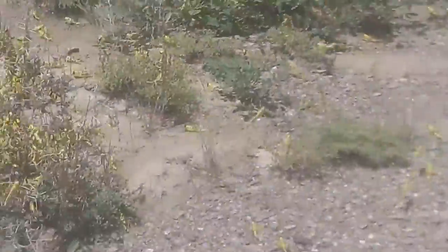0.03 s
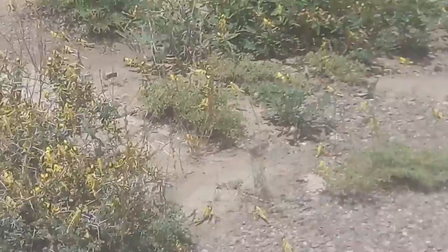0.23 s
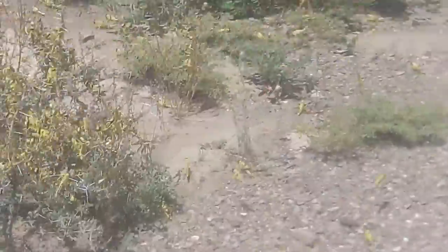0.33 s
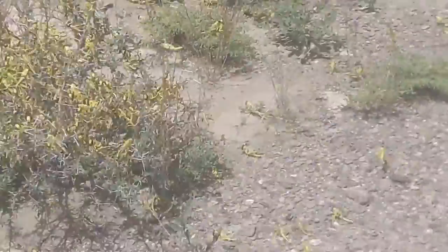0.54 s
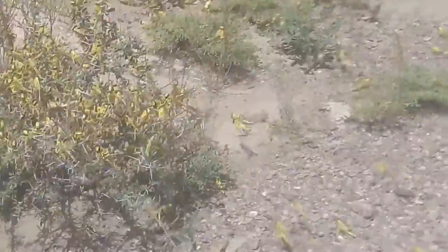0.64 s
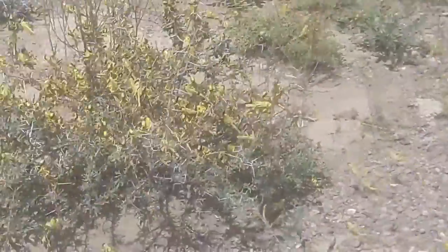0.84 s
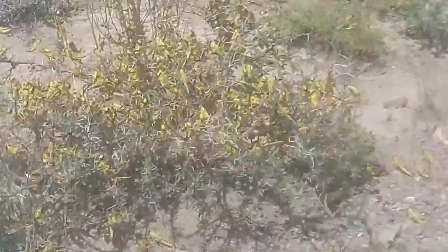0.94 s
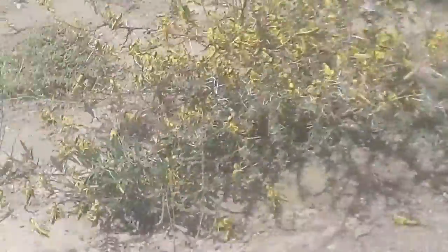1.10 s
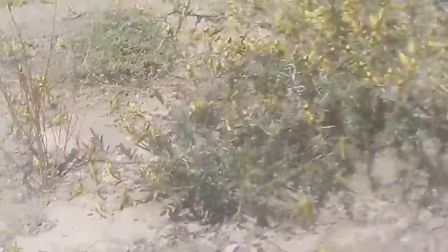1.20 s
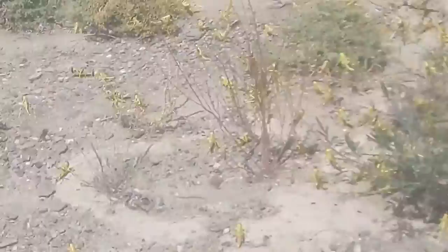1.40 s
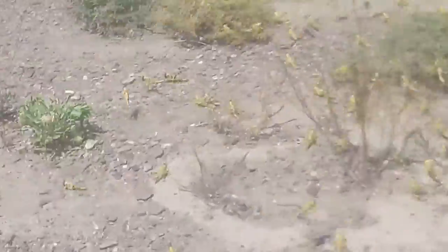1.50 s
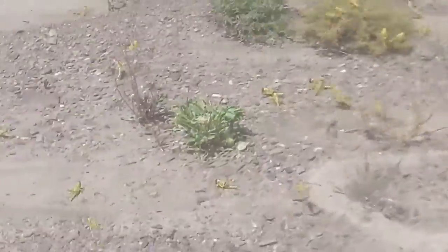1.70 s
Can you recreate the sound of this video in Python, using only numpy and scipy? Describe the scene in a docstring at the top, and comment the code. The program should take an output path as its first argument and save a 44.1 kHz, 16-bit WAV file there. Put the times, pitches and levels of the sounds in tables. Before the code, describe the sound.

Wind buffets the microphone with low thumps and pops, strongest from about 0.4 to 0.8 seconds and again near 1.1, then dropping to a soft rumble after 1.5. Throughout, a locust swarm makes quieter ticks, papery wing flutters and small dry snaps on twigs and stones. Grit crunches lightly around 0.3 and 0.5 seconds. A distant bird gives two faint short whistles at about 1.2 and 1.3 seconds.

```python
"""Gusts thump on a hand-held microphone over the ticking and rustling of a locust swarm in dry scrub.
Wind eddies give low buffeting and single pops. The insects make countless tiny leg ticks, papery
wing strokes and a few near snaps as they land on twigs and stones. Something scuffs and crunches
the grit, and a distant bird whistles two short notes over a steady low rumble of air."""
import sys
import numpy as np
from scipy import signal
from scipy.fft import rfft, irfft, next_fast_len
from scipy.io import wavfile
from scipy.ndimage import uniform_filter1d, map_coordinates

SR = 44100
rng = np.random.default_rng(int(sys.argv[2]) if len(sys.argv) > 2 else 0)


def store_pcm(level_fs):
    """Save levels as 16-bit WAV."""
    pcm = np.round(np.clip(level_fs, -1, 1) * 32767).astype(np.int16)
    wavfile.write(sys.argv[1], SR, np.atleast_2d(pcm).T)


N = 77175

# Spectrum of a struck dry twig. Each row: frequency in Hz, gain in dB.
TWIG_SPECTRUM = [(300, -5), (1500, -6.5), (3500, -6.5), (5200, -10), (6300, -0.5), (7200, 8), (8150, -11),
                 (9000, -1), (11500, -6.5), (13500, -9), (15600, -27)]


def amp(db):
    return 10 ** (np.asarray(db) / 20)


def unit_rms(x):
    return x / np.sqrt(np.mean(x ** 2) + 1e-20)


def time_s():
    return np.arange(N) / SR


def wobble(knots_per_s):
    """Smooth random curve."""
    return map_coordinates(rng.standard_normal(2000), [time_s() * knots_per_s + 2], mode="wrap")


def colour(x, spectrum):
    """Minimum-phase filter shaped by (Hz, dB) rows, scaled to unit power gain."""
    size = 2 * next_fast_len(N)
    hz, db = np.transpose(spectrum)
    gain = amp(np.interp(np.log(np.fft.rfftfreq(size, 1 / SR) + 1), np.log(hz), db))
    cepstrum = irfft(np.log(unit_rms(gain)))
    cepstrum[1:size // 2] *= 2
    cepstrum[size // 2 + 1:] = 0
    return irfft(rfft(x, size) * np.exp(rfft(cepstrum)), size)[:N]


def noise(spectrum):
    return unit_rms(colour(rng.standard_normal(N), spectrum))


def turbulence(spectrum, evenness):
    """Coloured noise, rms 1; evenness from 0 to 1 flattens its chance swells."""
    x = noise(spectrum)
    power = uniform_filter1d(np.abs(signal.hilbert(x)) ** 2, size=800)
    return unit_rms(x / (np.abs(power) + 1e-6) ** (evenness / 2))


def ticks(per_s, spread_db):
    """Random tiny impacts of uneven size, rms 1."""
    size = amp(spread_db * np.clip(rng.standard_normal(N), -2, 2))
    return unit_rms((rng.random(N) < per_s / SR) * size * rng.choice([-1, 1], N))


def swells(rows):
    """Bell-shaped envelopes, summed in power."""
    return np.sqrt(sum(amp(2 * db) * np.exp(-(2 * (time_s() - centre_s) / length_s) ** 2)
                       for centre_s, length_s, db in rows))


def wind(strong_db=-20):
    """Large eddies buffet in step with the wind; smaller ones grow faster, the smallest flare in gusts."""
    # Each row: time in seconds, wind level in dB.
    wind_levels = [(0, -31.5), (0.064, -39.5), (.11, -52.5), (.16, -47), (0.188, -32.5), (.24, -33.5),
                   (0.255, -26), (0.286, -34.5), (0.382, -36), (0.424, -21.5), (0.477, -28.5), (0.498, -21),
                   (0.568, -18.5), (0.603, -26), (0.617, -18.5), (.65, -33), (0.705, -33.5), (0.714, -21),
                   (0.773, -18.5), (.783, -20.5), (0.793, -35.5), (0.858, -29.5), (.9, -41), (.985, -37),
                   (1.051, -47), (1.059, -28), (1.075, -33), (1.091, -20.5), (1.118, -29.5), (1.151, -22),
                   (1.19, -28), (1.233, -23), (1.245, -35.5), (1.352, -33.5), (1.382, -28), (1.425, -38),
                   (1.433, -27.5), (1.452, -27), (1.487, -30), (1.502, -54), (1.6, -46), (1.705, -68),
                   (1.75, -66)]
    # Each row: centre in seconds, length in seconds, relative level in dB.
    gusts = [(.275, 0.085, -52), (.424, 0.028, -31.5), (.5, 0.021, -43), (.552, 0.0048, -30),
             (.58, 0.028, -37.5), (.618, 0.006, -31), (.725, 0.038, -40), (.758, 0.035, -30.5),
             (1.063, 0.016, -42), (1.16, 0.072, -47), (1.3, 0.063, -53)]
    # Large, middle and small eddies. Each row: frequency in Hz, gain in dB.
    buffet_spectrum = [(20, -33.5), (45, -14), (75, -2.5), (125, 4), (190, -7.5), (280, -18.5), (400, -36),
                       (600, -60.5), (1200, -66)]
    flutter_spectrum = [(60, -27), (130, -1), (180, 0.5), (290, -2.5), (390, -15), (600, -30), (1200, -59)]
    eddy_spectrum = [(100, -31.5), (250, 4), (480, -1), (700, -13.5), (1000, -25), (1500, -32.5),
                     (3000, -62)]
    over_db = np.interp(time_s(), *np.transpose(wind_levels)) - strong_db
    buffet = amp(strong_db - 2 + over_db) * turbulence(buffet_spectrum, evenness=0.52)
    flutter = amp(strong_db - 4.5 + 1.48 * over_db) * turbulence(flutter_spectrum, evenness=0.69)
    eddy_level = np.hypot(amp(strong_db - 25 + 2.5 * over_db), amp(2) * swells(gusts))
    return buffet + flutter + eddy_level * turbulence(eddy_spectrum, evenness=0.83)


def eddy_pops():
    """Each eddy passing the microphone gives one pull and push of pressure, sharper if smaller."""
    # Each row: centre in seconds, half-width in ms, peak before filtering in dB.
    eddies = [(0.22, 1, -28.5), (0.2578, 2.8, -18.5), (0.324, 1.9, -23.5), (0.4248, 0.92, -13.5),
              (0.45, 1, -21), (0.524, 0.89, -19.5), (.554, 0.9, -11), (.617, 0.97, -13), (0.712, 1.4, -18),
              (.763, 1.02, -10.5), (0.854, 1.55, -23.5), (0.991, 1.36, -31.5), (1.062, 1.4, -24),
              (1.094, 1.22, -18), (1.161, 0.8, -20.5), (1.431, 2, -20), (1.543, 2.9, -37),
              (1.598, 1.3, -40.5), (1.68, 4.3, -37), (1.731, 4.3, -31.5)]
    # Each row: frequency in Hz, gain in dB.
    pop_spectrum = [(20, -54), (50, -8), (100, -3), (200, 3), (300, -2.5), (400, -11.5), (700, -5),
                    (2000, -6.5)]
    pressure = np.zeros(N)
    for centre_s, half_width_ms, db in eddies:
        offset = (time_s() - centre_s) * 1000 / half_width_ms
        pulse = offset / (1 + offset ** 2) ** 2
        pressure += amp(db) * pulse / np.abs(pulse).max()
    return unit_rms(colour(pressure, pop_spectrum)) * pressure.std()


def swarm():
    """Locusts on dry ground: a far hiss, clumped leg ticks and near bursts of rustling."""
    # Each row: frequency in Hz, gain in dB.
    far_spectrum = [(100, -4), (500, -0.5), (1000, 0), (2000, -6), (3300, 0), (5000, -5), (6200, 0.5),
                    (7250, 3), (8150, -9.5), (9000, -3), (11500, -1.5), (13500, -11), (15600, -22)]
    near_spectrum = [(300, -24), (1500, -2), (3500, -5.5), (5200, -5.5), (6300, 0), (7250, 7), (8150, -14),
                     (9000, -1.5), (11500, -7.5), (13500, -17), (15600, -11)]
    # Each row: centre in seconds, length in seconds, relative level in dB.
    rustles = [(.06, 0.064, -52.5), (.155, 0.014, -51.5), (.32, 0.07, -48.5), (.675, 0.048, -50),
               (.807, 0.011, -47), (.837, 0.021, -49), (.885, 0.065, -50.5), (1.0, 0.041, -54),
               (1.07, 0.035, -52), (1.196, 0.032, -47), (1.29, 0.054, -51.5), (1.34, 0.05, -53.5),
               (1.7, 0.013, -48)]
    hiss = amp(-57 + 0.067 * wobble(17)) * noise(far_spectrum)
    legs = unit_rms(ticks(per_s=1500, spread_db=6.5) * amp(2 * np.tanh(wobble(69.44))))
    bursts = swells(rustles) * unit_rms(ticks(per_s=4000, spread_db=10) * amp(2.7 * wobble(220)))
    return hiss + colour(amp(-59.5) * legs + amp(-2.5) * bursts, near_spectrum)


def landing_snaps(t60_s=0.0057, treble_hz=8300):
    """Near landings on twigs and stones: one dry crack each, dull or bright."""
    # Each row: start in seconds, relative level in dB, treble gain in dB.
    landings = [(0.1402, -28.5, 5), (0.1613, -34.5, 10), (0.2643, -16.5, -12), (.3047, -39, -10),
                (0.374, -28.5, 4), (0.3933, -25, -7), (0.5152, -24, -9), (0.604, -23.5, -26),
                (0.667, -26, -4), (0.68, -32, 2), (0.742, -35.5, 11.5), (.829, -30, -5),
                (0.8401, -26.5, -10), (0.91, -32, -7), (1.0022, -29, -6), (1.0659, -33, 10.5),
                (1.0719, -26, -7), (1.141, -27, -1), (1.2028, -35, 13), (1.2875, -30.5, -5),
                (1.427, -27, 6), (1.431, -31.5, 8), (1.51, -33, 5.5), (1.64, -33, 7)]
    out = np.zeros(N)
    t = np.arange(SR // 50) / SR
    highpass = signal.butter(2, treble_hz, "high", fs=SR, output="sos")
    for start_s, db, treble_db in landings:
        crack = rng.standard_normal(len(t)) * amp(-60 * t / t60_s)
        crack += (amp(treble_db) - 1) * signal.sosfiltfilt(highpass, crack, padtype=None)
        out[round(start_s * SR):][:len(t)] += amp(db - 10) * crack
    return colour(out, TWIG_SPECTRUM)


def wings(fliers=4, mid_beat_hz=21.36, stroke_decay_s=0.0028):
    """Each flier beats at its own pace, every stroke a short papery crackle."""
    # Each row: frequency in Hz, gain in dB.
    wing_spectrum = [(500, -1), (2000, -19.5), (3600, -1), (5000, -1), (6300, -0.5), (7200, -6), (8150, 3),
                     (9000, -4), (11500, -0.5), (13500, -11), (15600, -8.5)]
    strokes = np.zeros(N)
    for pace, start_cycles in rng.random((fliers, 2)):
        beat_hz = mid_beat_hz * (1 + 0.44 * (pace - 0.5))
        cycles = start_cycles + np.cumsum(beat_hz * (1 + 0.065 * wobble(8.7))) / SR
        age_s = cycles % 1 / beat_hz
        strokes += amp(1.6 * wobble(6.46)) * np.exp(-age_s / stroke_decay_s)
    return amp(-61) * unit_rms(colour(strokes * ticks(per_s=8200, spread_db=7.5), wing_spectrum))


def stalk_crackle(t60_s=0.00061):
    """The nearest insects tick one by one on two dry stalks."""
    t = np.arange(SR // 200) / SR
    rings = rng.standard_normal((2, len(t))) * amp(-60 * t / t60_s)
    hits = sum(np.convolve(ticks(per_s=35, spread_db=5.5), ring)[:N] for ring in rings)
    return amp(-63) * unit_rms(colour(hits, TWIG_SPECTRUM))


def grit_crunches(attack_s=0.0012, t60_s=0.026):
    """Single bits of grit give way, each in a quick burst of noise."""
    # Each row: start in seconds, relative level in dB, centre in Hz.
    crunches = [(0.255, -41, 2700), (.263, -39.5, 2700), (0.28, -41, 2600), (0.294, -39, 2600),
                (.316, -48, 2730), (0.337, -40.5, 2140), (.438, -41, 2050), (.4875, -37, 2150),
                (.497, -38.5, 2050), (0.499, -40, 2270)]
    # Each row: multiple of the centre frequency, gain in dB.
    pebble_spectrum = [(.2, -1), (.55, -6), (1, 0), (1.3, -6), (1.8, -25), (5, -23)]
    out = np.zeros(N)
    for start_s, db, centre_hz in crunches:
        age_s = np.maximum(time_s() - start_s, 0)
        envelope = (1 - np.exp(-age_s / attack_s)) * amp(-60 * age_s / t60_s)
        spectrum = [(ratio * centre_hz, gain_db) for ratio, gain_db in pebble_spectrum]
        out += amp(db) * envelope * noise(spectrum)
    return out


def grit_scuffs():
    """Scraped grit: swells of dense, dull grains."""
    # Each row: centre in seconds, length in seconds, level in dB, centre in Hz.
    scuffs = [(0.305, 0.084, -53, 1980), (0.467, 0.043, -56, 2140), (1.185, 0.18, -57.5, 2000)]
    # Each row: multiple of the centre frequency, gain in dB.
    grit_spectrum = [(.15, -21), (.4, 5), (.8, 2.5), (1.25, -3.5), (1.8, 0.5), (3, -16), (6, -43)]
    out = np.zeros(N)
    for centre_s, length_s, db, centre_hz in scuffs:
        spectrum = [(ratio * centre_hz, gain_db) for ratio, gain_db in grit_spectrum]
        grains = colour(ticks(per_s=5400, spread_db=8), spectrum)
        out += swells([(centre_s, length_s, db)]) * unit_rms(grains)
    return out


def bird(pitch_jitter=0.0218, waver_db=0.5):
    """Two thin, unsteady whistles; the octave comes out as the last glide settles."""
    # One list per note. Each row: time in seconds, pitch in Hz, level in dB, relative octave level in dB.
    notes = [
        [(1.183, 2740, -54, -16), (1.191, 2520, -50.5, -16), (1.21, 2650, -74, -16)],
        [(1.278, 2926, -58, -11), (1.286, 3170, -51, -14), (1.294, 3637, -56, -14), (1.301, 3740, -55, -14),
         (1.313, 2880, -56, -13), (1.323, 2840, -53.5, -1), (1.342, 2680, -66, -8)],
    ]
    out, t = np.zeros(N), time_s()
    for note in notes:
        knots_s, hz, db, octave_db = np.transpose(note)
        glide_hz = uniform_filter1d(np.interp(t, knots_s, hz), size=200)
        phase = 2 * np.pi * np.cumsum(glide_hz * (1 + pitch_jitter * wobble(500))) / SR
        gate = (t > knots_s[0]) * (t < knots_s[-1])
        envelope = uniform_filter1d(amp(np.interp(t, knots_s, db)) * gate, size=150)
        octave = amp(np.interp(t, knots_s, octave_db)) * np.sin(2 * phase)
        out += envelope * amp(waver_db * wobble(150)) * (np.sin(phase) + octave)
    return out


def scrub_scatter(x, echo_db=-9.5, t60_s=0.1):
    """Scattering off ground and scrub blurs a far sound."""
    t = np.arange(SR // 4) / SR
    tail = rng.standard_normal(len(t)) * amp(-60 * t / t60_s)
    return x + amp(echo_db) * signal.fftconvolve(x, tail / np.linalg.norm(tail))[:N]


def air_rumble():
    """Steady low air that stays between the gusts."""
    # Each row: frequency in Hz, gain in dB.
    rumble_spectrum = [(20, -33), (70, 2.5), (110, -5), (170, -22), (300, -25), (800, -50.5)]
    return amp(-51.5) * turbulence(rumble_spectrum, evenness=0.17)


def scene():
    locusts = swarm() + wings() + stalk_crackle() + landing_snaps()
    air = wind() + eddy_pops() + air_rumble()
    grit = grit_scuffs() + grit_crunches()
    return (air + locusts + grit + scrub_scatter(bird()))[None]


def record(dry):
    """Brick-wall low-pass."""
    top_hz = 15750
    size = next_fast_len(N + SR // 2)
    passband = np.fft.rfftfreq(size, 1 / SR) < top_hz
    return irfft(rfft(dry, size) * passband, size)[..., :N]


dry = scene()
out = record(dry)
store_pcm(out)
```